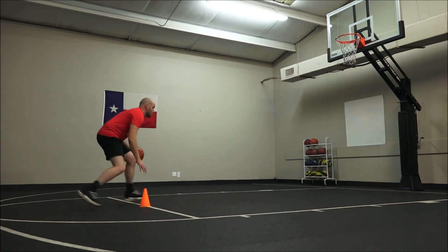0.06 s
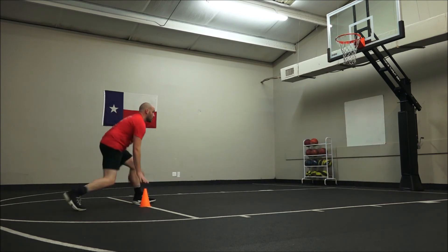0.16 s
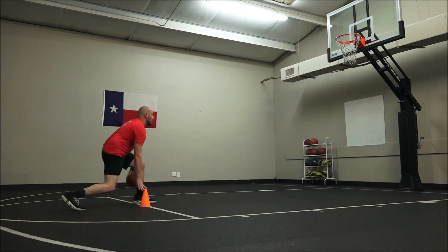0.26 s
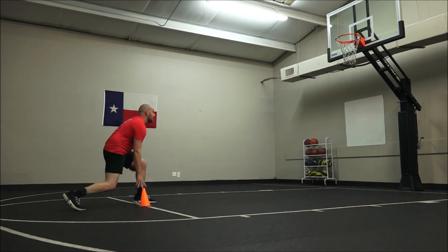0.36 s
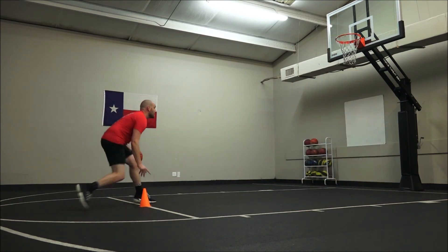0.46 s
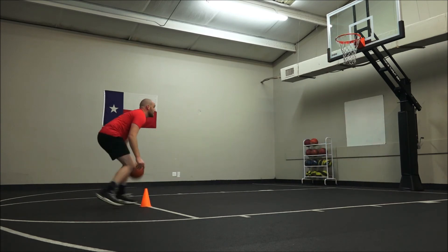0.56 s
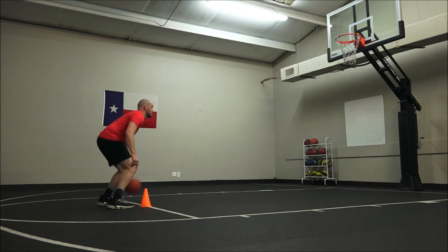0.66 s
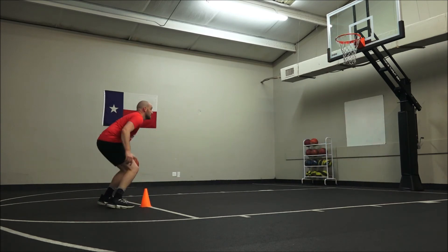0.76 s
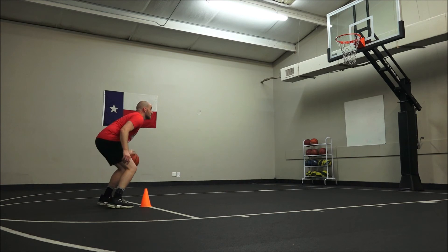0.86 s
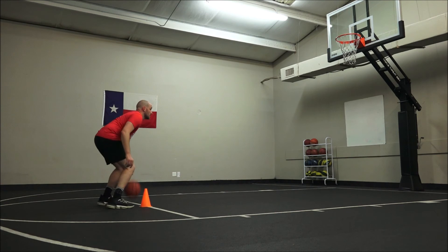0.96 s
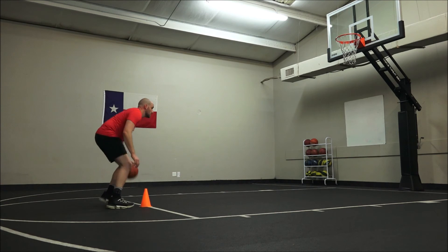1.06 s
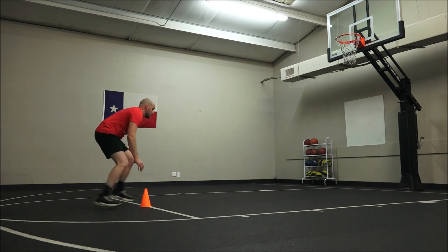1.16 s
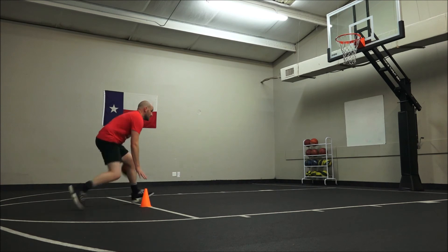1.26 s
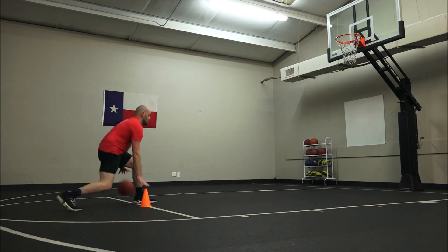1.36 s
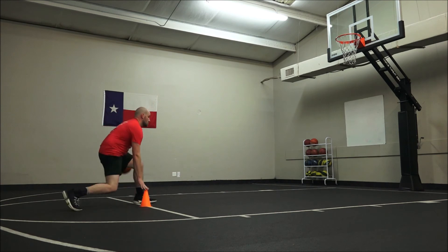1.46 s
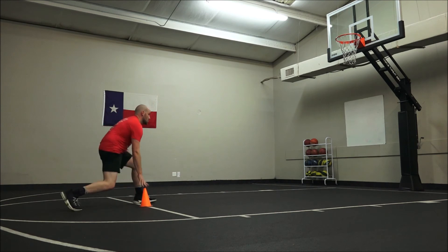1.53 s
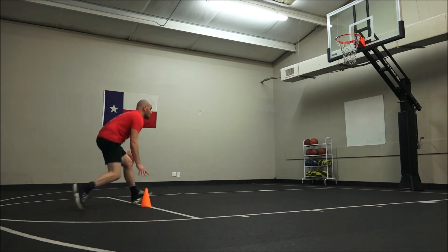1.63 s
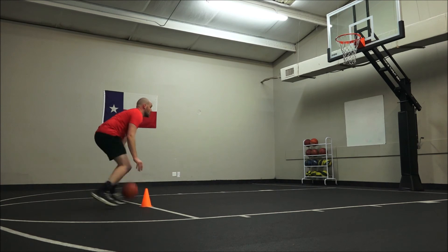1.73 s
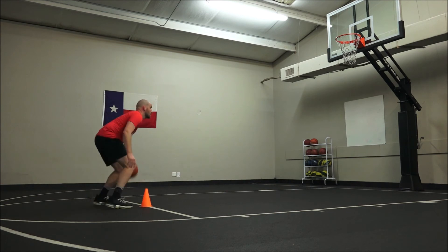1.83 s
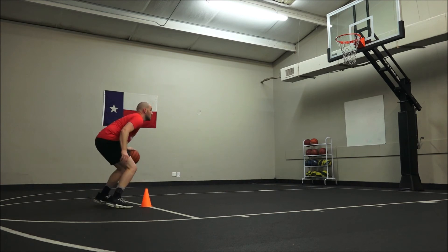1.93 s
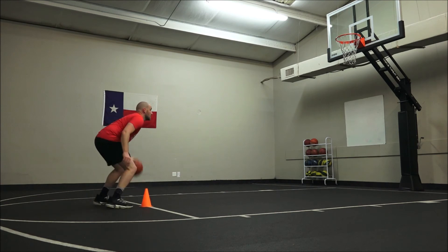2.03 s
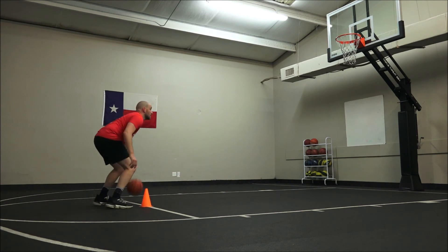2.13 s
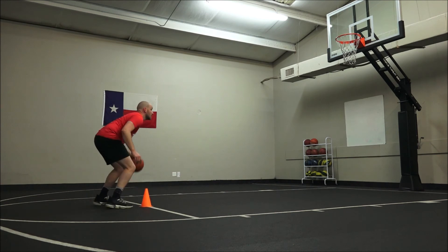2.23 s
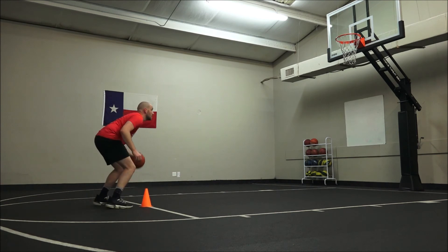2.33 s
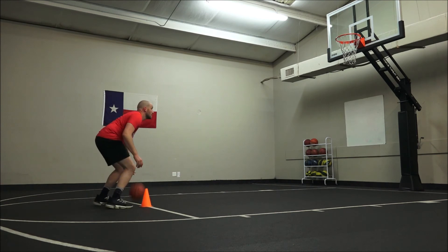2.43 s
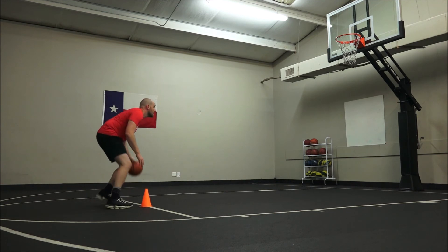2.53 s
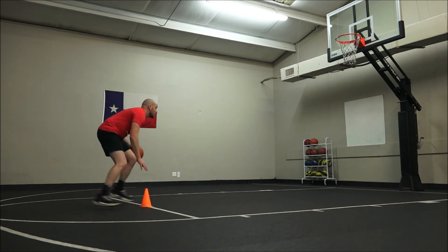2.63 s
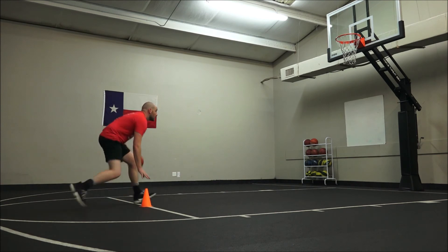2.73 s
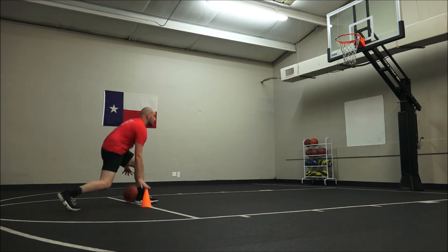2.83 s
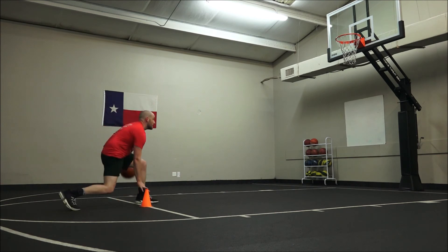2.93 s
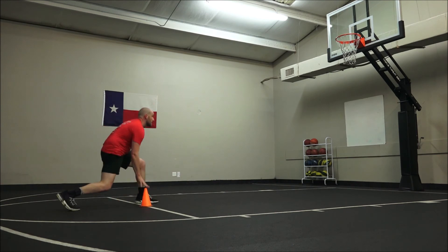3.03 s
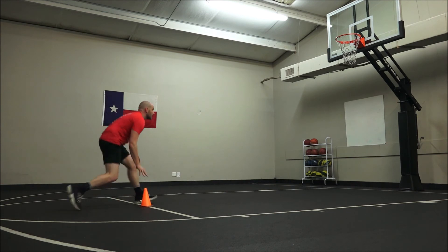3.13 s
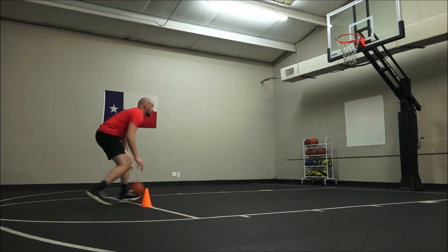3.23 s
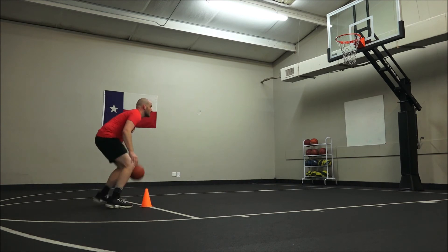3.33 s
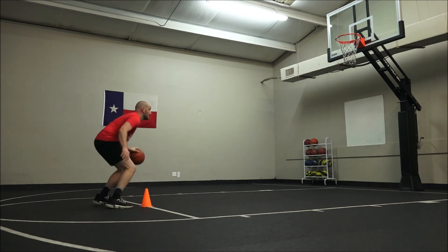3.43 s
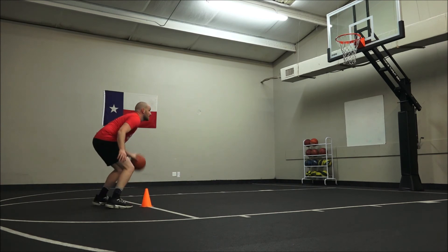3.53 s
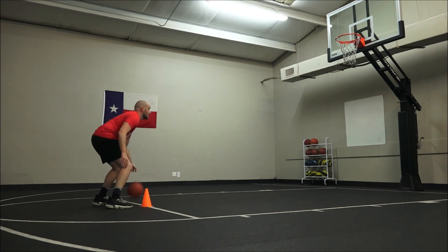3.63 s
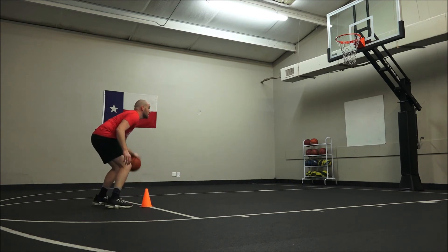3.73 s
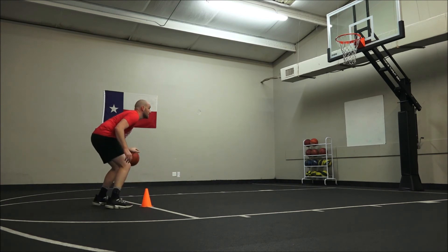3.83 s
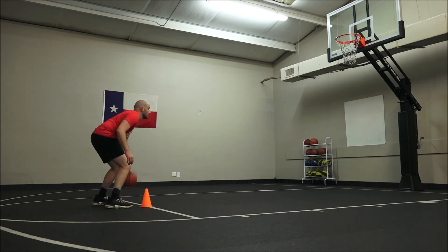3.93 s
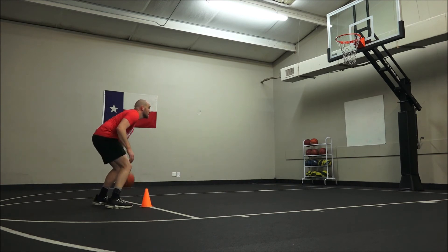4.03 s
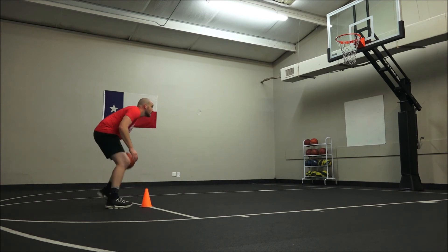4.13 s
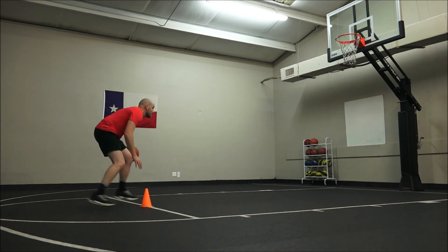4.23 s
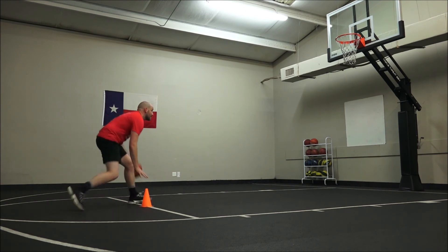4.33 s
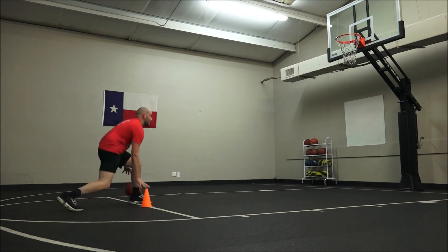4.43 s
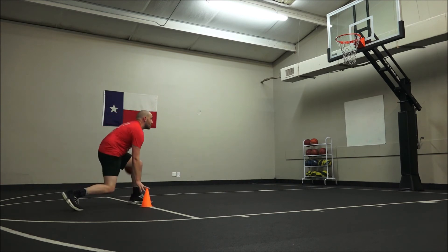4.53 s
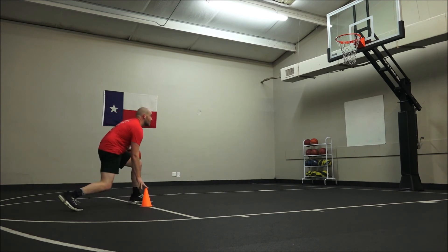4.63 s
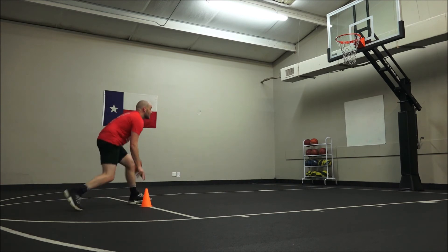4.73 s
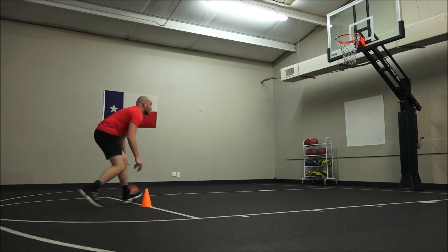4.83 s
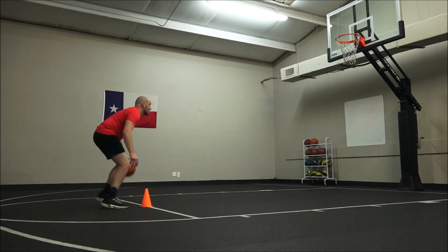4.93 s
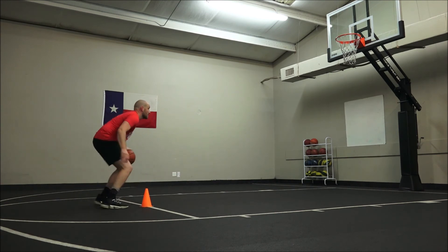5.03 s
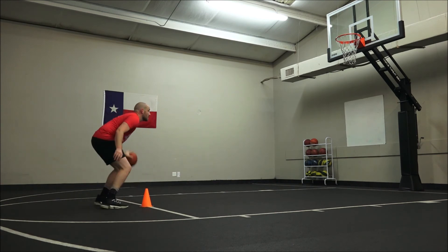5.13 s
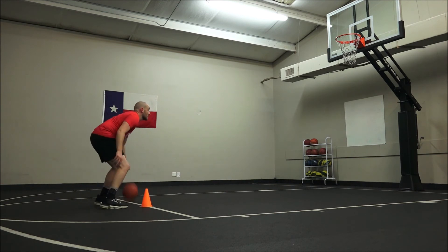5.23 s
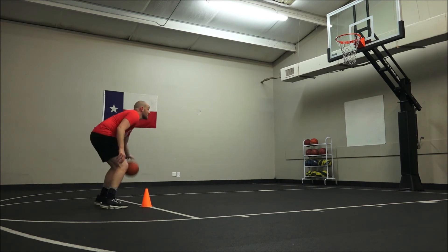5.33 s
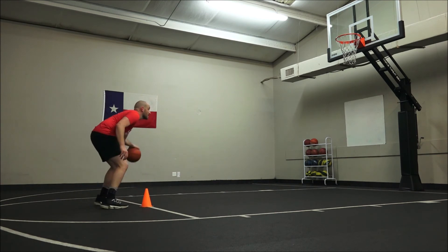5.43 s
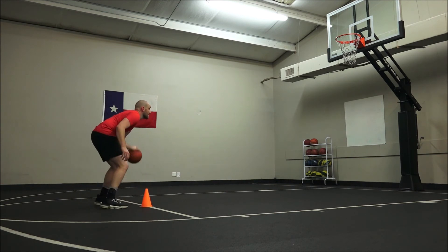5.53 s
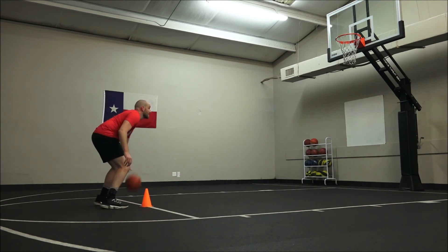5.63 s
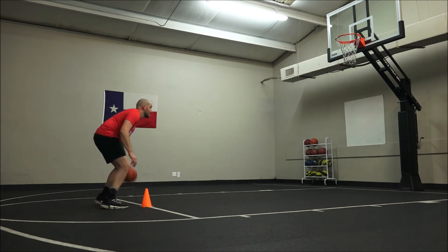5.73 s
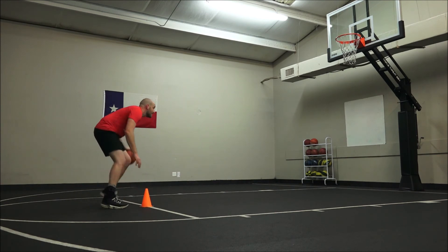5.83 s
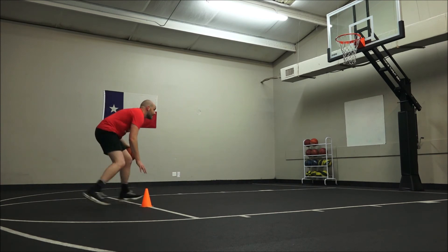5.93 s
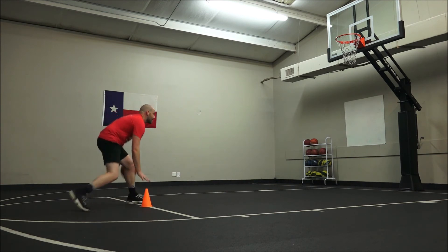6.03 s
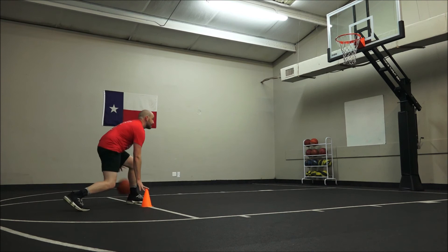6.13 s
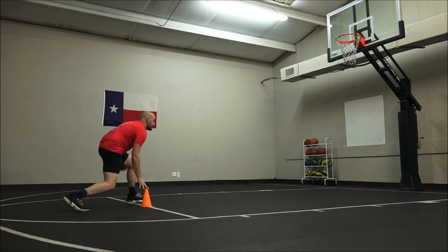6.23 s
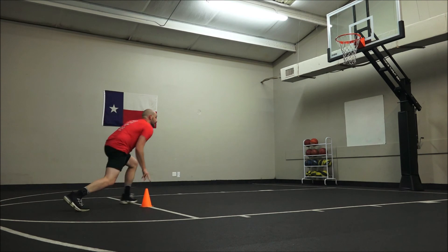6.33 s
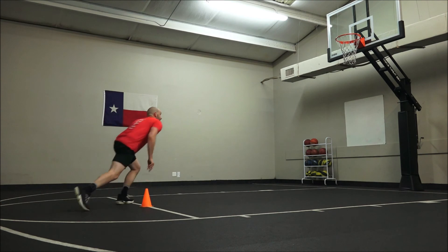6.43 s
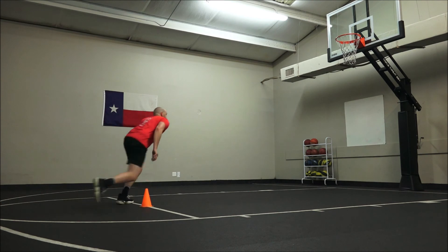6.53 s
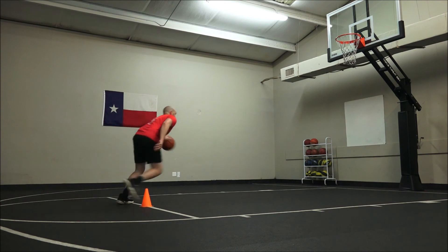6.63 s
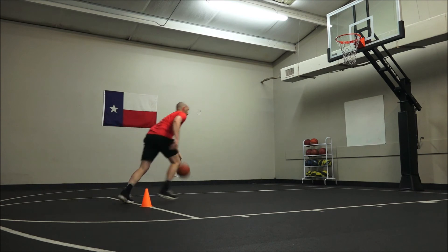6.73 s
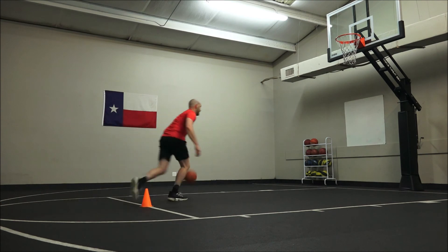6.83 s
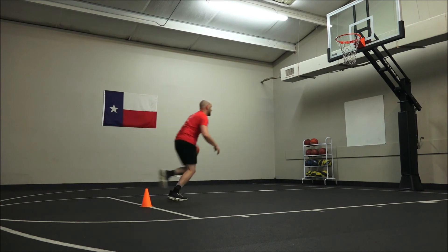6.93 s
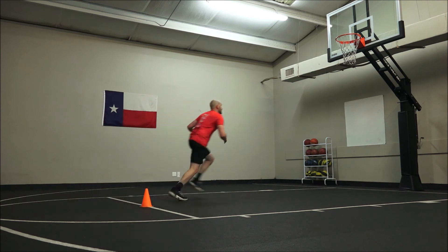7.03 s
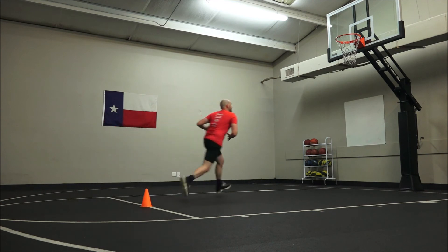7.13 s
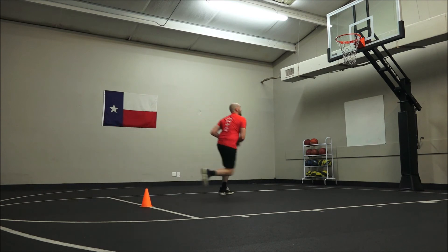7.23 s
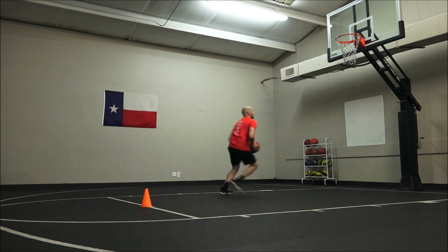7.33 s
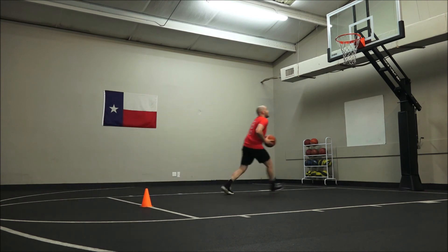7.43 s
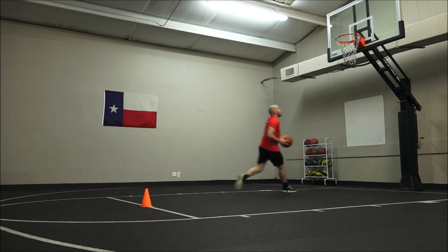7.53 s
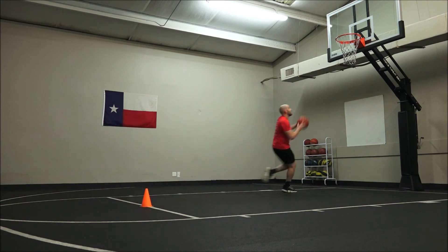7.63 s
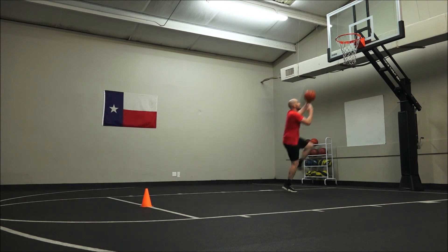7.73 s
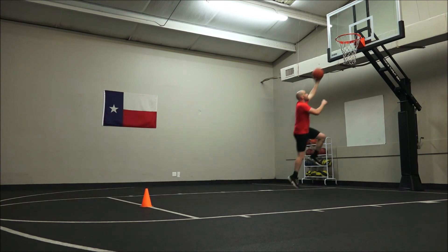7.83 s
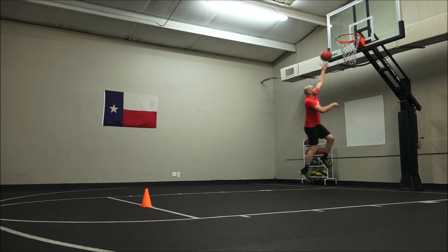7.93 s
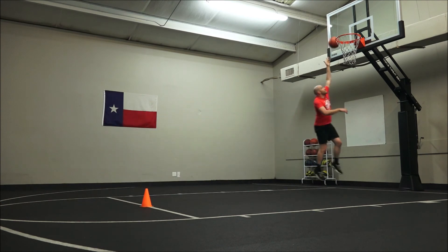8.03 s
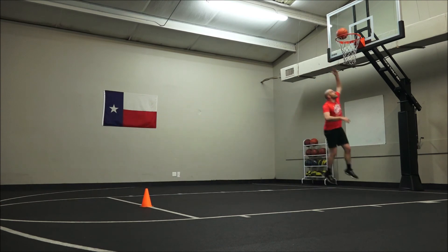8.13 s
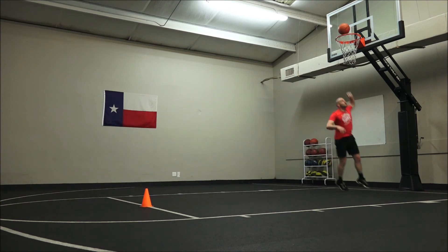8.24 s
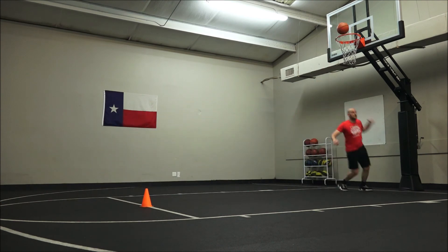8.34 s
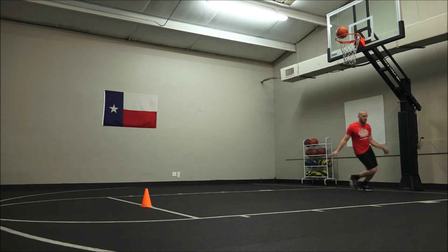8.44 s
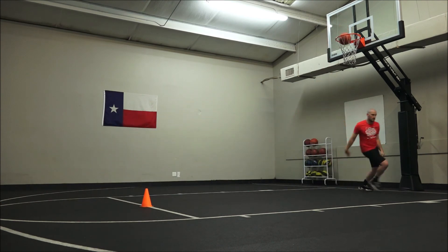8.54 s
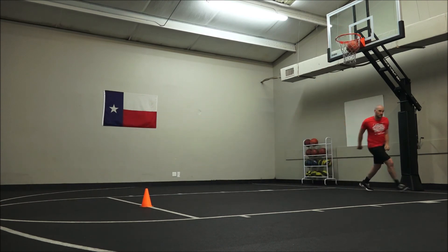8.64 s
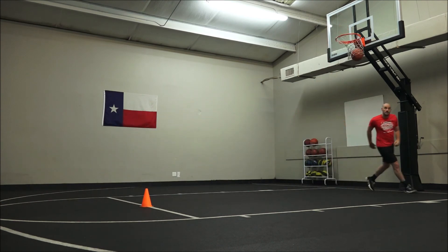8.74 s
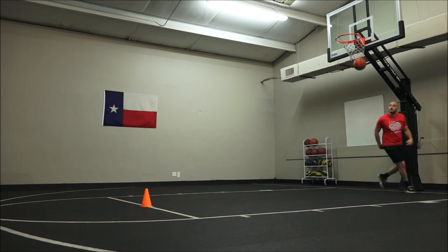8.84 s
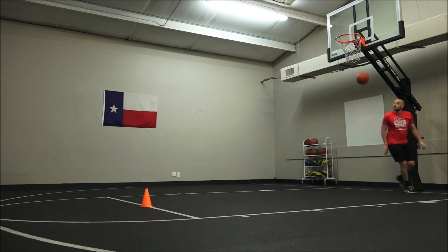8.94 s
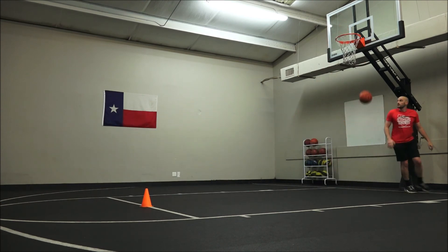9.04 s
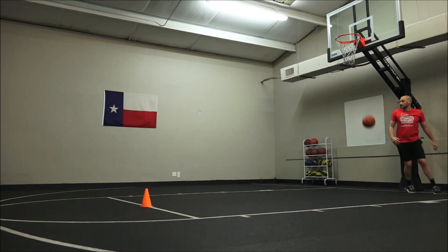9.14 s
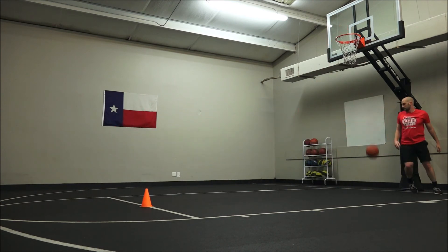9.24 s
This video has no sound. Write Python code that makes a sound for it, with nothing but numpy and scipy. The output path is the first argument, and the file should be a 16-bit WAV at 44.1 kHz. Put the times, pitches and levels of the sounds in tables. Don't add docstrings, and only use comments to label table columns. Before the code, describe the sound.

A small hard-walled gym with soft air noise and a faint low fan hum. The tail of a bounce hangs at the start; from 0.3 seconds a basketball is dribbled hard, one slap roughly every 0.35 to 0.45 seconds until 6.2. Each is a sharp crack with a very short hollow ball ring, a deep floor thump, quick wall echoes and about a second of reverberation. A shoe scuffs and knocks at 0.6 to 0.7, a duller knock comes at 4.4, and light scuffs near 6.1 and 6.4. A last strong dribble lands at 6.9 with running steps, then more steps at 7.3 and 7.6, farther and more echoing. At 8.25 the ball hits the backboard, its stand swaying low, followed by dull basket knocks and net rustle. Bright landing steps and scuffs follow at 8.6 to 8.75, then a distant bounce at 9.2.

```python
import sys
import numpy as np
from scipy import signal
from scipy.fft import rfft, irfft, next_fast_len
from scipy.io import wavfile

SR = 44100
rng = np.random.default_rng(int(sys.argv[2]) if len(sys.argv) > 2 else 0)


def attenuation_scalar(level_db):
    decades = np.asarray(level_db, float) / 20
    return 10 ** decades


def transcribe(signal):
    frames = np.atleast_2d(signal).T
    limited = np.clip(frames, -1, 1)
    pcm = np.round(limited * 32767).astype(np.int16)
    wavfile.write(sys.argv[1], SR, pcm)


N = 408807

# frequency in Hz, density in dB per Hz.
AIR_SPECTRUM = [(20, -7), (45, 0.5), (100, -8.5), (300, -9.5), (600, -12), (1200, -14.5), (4600, -23.5),
                (9200, -31.5), (13000, -31), (15000, -38), (16000, -70)]
AIR_DB = -56
# frequency in Hz, width in Hz, level in dB.
FAN_LINES = [(134.6, 6, -68), (150.7, 3, -63)]

# delay in seconds, level in dB.
ECHOES = [(0, 1), (.0025, 0.5), (.018, -1), (.0205, -1.5), (.024, -4.5), (.031, -4.5), (.041, -3),
          (.057, -6.5)]
TAIL_S = .018
# frequency in Hz, 60 dB decay time in seconds.
GYM_T60 = [(100, 2), (250, 0.87), (500, 1.68), (1100, 1.03), (3000, 1.316), (7000, 1.26), (10000, 0.77),
           (13000, 0.58)]
# frequency in Hz, density in dB per Hz.
COLOUR = [(60, -41.5), (150, -8.5), (250, -8.5), (400, -10), (520, -18), (680, -23), (950, -15.5),
          (1500, -13.5), (3000, -17), (5300, -21), (7500, -30), (10500, -40.5), (12300, -38), (14500, -44),
          (16200, -70)]

# frequency in Hz, level in dB, 60 dB decay time in seconds.
MODES_WITH = [(60.6, -25.5, 0.72), (69.4, -29.5, 1.1), (106.3, -9.5, 0.62), (117.3, -35, 1.3),
              (129.8, -14, 0.58), (134, -40, 1.4), (163.2, -27.5, 1.37), (180.6, -31.5, 0.74),
              (193, -22.5, 0.8), (231.4, -32.5, 2.75), (339, -50.5, 0.27), (375.4, -34, 1.78)]
# frequency in Hz, level in dB, 60 dB decay time in seconds.
MODES_AGAINST = [(80.8, -23.5, 1), (92.1, -21.5, 1), (99.8, -19.5, 0.92), (184.3, -20.5, 0.39),
                 (208.2, -20.5, 0.57), (239.2, -16, 0.278), (242.7, -35.5, 1), (261, -42, 0.11),
                 (318.8, -26, 0.46)]

# centre in seconds, level in dB, length in seconds, centre frequency in Hz.
SCUFFS = [(0.642, -39, 0.057, 1764), (1.712, -59, 0.11, 3470), (3.21, -79, .08, 3500),
          (6.096, -51, 0.044, 2500), (6.428, -41, 0.088, 6980), (7.314, -73, 0.049, 950),
          (8.4, -52, .12, 496), (8.375, -47, 0.092, 3660), (8.617, -41.5, 0.11, 3386),
          (8.759, -42.5, 0.1, 5630), (7.308, -40, .05, 10000), (9.191, -54.5, .05, 1390)]

# start in
# seconds, knock in dB, ring in Hz, floor thump in dB.
FAR_STEPS = [
    (6.868, -17, 240, -57),
    (7.33, -28, 440, -67),
    (8.572, -24, 930, -62),
    (8.74, -24.5, 1150, -45),
    (8.58, -30, 385, -55),
]
STEP_CRACK_DB = -8
# start in seconds, knock in dB, ring in Hz, crack in dB over the ring, floor thump in dB.
FAR_KNOCKS = [
    (7.28, -27.5, 1135, 1.5, -47.5),
    (7.305, -22, 960, -3.5, -70),
    (7.562, -28, 895, -1.5, -75),
    (7.636, -35.5, 4450, 9, -70),
    (8.243, -24.5, 1230, 4, -46),
    (8.313, -17.5, 580, -23, -65),
    (8.344, -25, 553, 1, -45),
    (8.37, -31, 527, -18, -40),
    (8.567, -20, 3540, 3, -43),
    (9.209, -17, 660, -5.5, -54),
]
# frequency in Hz, level in dB, 60 dB decay time in seconds.
BOARD_MODES = [(41.3, -11, 1.8), (52, -14, 1.16), (68.2, 1.5, 0.38), (90.5, -2, 0.33), (146, -5.5, 0.43),
               (214, -4.5, 0.24)]
BOARD_S, BOARD_DB = 8.241, -34.5

# start in seconds, knock in dB, ring in Hz, crack in dB over the ring.
NEAR_KNOCKS = [
    (.005, -33, 1070, -13),
    (0.6, -23, 1544, -6),
    (.665, -12.5, 1740, -5.5),
    (4.382, -18, 960, -12),
]

# start in seconds, slap in dB, ball ring in Hz, crack in dB over the ring, floor thump in dB.
BOUNCES = [(-0.12, -13, 1210, 1.5, -23), (0.28, -14, 977, 4.5, -23.5), (0.702, -17.5, 1010, 11.5, -21.5),
           (1.052, -12.5, 967, 7.5, -22.5), (1.408, -13.5, 1262, 5.5, -21), (1.814, -13, 1190, 8, -25),
           (2.174, -10.5, 1243, -2, -24.5), (2.512, -10, 873, 2.5, -22), (2.907, -15, 966, 7.5, -23.5),
           (3.317, -9, 999, -2.5, -25), (3.689, -12.5, 1030, 6, -23), (4.048, -14, 2222, 5, -25.5),
           (4.484, -12.5, 990, 4.5, -24.5), (4.898, -12.5, 1410, 6.5, -22.5), (5.313, -11, 1537, 4.5, -22),
           (5.738, -11, 1850, 1, -20), (6.177, -11.5, 995, 2, -22), (6.862, -12.5, 1420, 4.5, -22.5)]
# frequency in Hz, level in dB, 60 dB decay time in seconds.
BALL_AIR = [(921, -46, 0.037), (1315, -28.5, 0.017), (1737, -35, 0.018), (2060, -31.5, 0.0059),
            (2500, -24.5, 0.005), (2900, -30, 0.0068)]
RING_T60 = .0065
SPOT_DB = 2.5
PANEL_DB = 1.6
USUAL_CRACK_DB, BEAMED = -11, 0.35
USUAL_KNOCK_DB, KNOCK_BEAMED, KNOCK_THUMP_DB = -14.5, 0.48, -60

# frequency in Hz, correlation.
PORT_LIKENESS = [(60, 1), (300, .996), (600, .99), (2400, .996), (4500, .995), (6000, .93), (7000, .8),
                 (8100, .3), (9600, -.15), (10700, .5), (11700, .97)]
# frequency in Hz, left minus right in dB.
PORT_LEAN = [(60, 3.5), (110, 4), (200, 2), (380, 1.1), (1000, .8), (2400, .2), (7000, .5), (8400, 1.6),
             (11000, .2)]


def evened(x):
    return x / np.sqrt(np.mean(x ** 2) + 1e-20)


def read(points, hz):
    f, value = np.transpose(points)
    return np.interp(np.log(hz + 1), np.log(f + 1), value)


def add(mix, s, sound):
    at = round(s * SR)
    sound = sound[..., max(-at, 0):]
    part = mix[..., max(at, 0):][..., :sound.shape[-1]]
    part += sound[..., :part.shape[-1]]


def causal(points, size=4096):
    hz = abs(np.fft.fftfreq(size, 1 / SR))
    log_gain = np.log(attenuation_scalar(np.maximum(read(points, hz), -100)))
    spectrum = np.exp(np.conj(signal.hilbert(log_gain)))
    return np.fft.ifft(spectrum).real[:size // 2]


def ring(modes, seconds):
    hz, db, t60 = np.transpose(modes)[..., None]
    t = np.arange(round(seconds * SR)) / SR
    return attenuation_scalar(db - 60 * t / t60) * np.sin(2 * np.pi * hz * t)


def room_tone():
    hz = np.fft.rfftfreq(N, 1 / SR)
    noise = rfft(rng.standard_normal((2, N)))
    tone = attenuation_scalar(AIR_DB) * evened(irfft(noise * attenuation_scalar(read(AIR_SPECTRUM, hz)), N))
    for f, width, db in FAN_LINES:
        resonance = 1 / (1 + (2 * (hz - f) / width) ** 2)
        hum = irfft(rfft(rng.standard_normal(N)) * resonance, N)
        tone = tone + attenuation_scalar(db) * evened(hum)
    return tone


def gym(early_db=-2, gap_db=-13, fill_s=0.02):
    hz, frames = np.fft.rfftfreq(256, 1 / SR), np.arange(400) * 128 / SR
    noise = rng.standard_normal((2, 129, 400, 2)) @ [1, 1j]
    decay = attenuation_scalar(-60 * frames / read(GYM_T60, hz)[:, None])
    tail = signal.istft(noise * decay, nperseg=256)[1]
    t = np.arange(tail.shape[1]) / SR
    filling = np.where(t < TAIL_S, attenuation_scalar(gap_db), 1 - 0.27 * np.exp(-(t - TAIL_S) / fill_s))
    tail = tail * filling / np.linalg.norm(tail[0])
    echoes = np.zeros(len(t))
    for s, db in ECHOES:
        echoes[round(s * SR * rng.uniform(.98, 1.02))] = attenuation_scalar(db)
    return echoes, attenuation_scalar(early_db + 13.5) * tail


def scuff(db, seconds, hz):
    size = round(seconds * SR)
    grain_gain = attenuation_scalar(6.7 * rng.standard_normal(size // 64 + 1)).repeat(64)[:size]
    grains = rng.standard_normal(size) * grain_gain
    band_filter = signal.butter(1, [hz / 1.48, hz * 2.13], "band", fs=SR)
    band = signal.lfilter(*band_filter, grains)
    echoes, tail = gym()
    heard = signal.fftconvolve((band * np.hanning(size))[None], echoes + tail, axes=1)
    return attenuation_scalar(db) * heard / np.sqrt(np.mean(heard[:, :2 * size] ** 2))


def thump(body, db, rise_s=0.0059):
    body = body * (1 - np.exp(-np.arange(len(body)) / SR / rise_s))
    return attenuation_scalar(db) * body / np.sqrt(np.mean(body[:SR // 10] ** 2))


def floor_thump(floor, spread_db, db):
    shares = attenuation_scalar(spread_db * rng.standard_normal(len(floor)))
    return thump(shares @ floor, db)


def backboard():
    return thump(ring(BOARD_MODES, 1.2).sum(0), BOARD_DB, rise_s=0.023)


def blow(db, ring_hz, crack_db, echo_db, shell=0, near_db=-8, far_db=-21, ring_t60=RING_T60,
         thin_hz=450, gap_db=-13):
    t = np.arange(SR // 20) / SR
    crack = attenuation_scalar(crack_db - 17 - 60 * t / .008) * rng.standard_normal(len(t))
    crack[0] += attenuation_scalar(crack_db + 2.0)
    ping = ring([(ring_hz, 0, ring_t60)], 1 / 20)[0]
    echoes, tail = gym(gap_db=gap_db)
    thin = signal.butter(2, thin_hz, "high", fs=SR)
    source = signal.lfilter(*thin, crack + attenuation_scalar(near_db) * ping + attenuation_scalar(7.0) * shell)
    direct = signal.oaconvolve(source, echoes)
    rung = signal.oaconvolve((attenuation_scalar(far_db) * ping + shell)[None], tail[::-1], axes=1)
    add(rung, 0, attenuation_scalar(crack_db) * tail)
    direct_db = -.6 * gap_db - 15.5
    return attenuation_scalar(db) * (attenuation_scalar(direct_db) * direct + attenuation_scalar(echo_db) * rung)


def far_knocks(bright, low, floor):
    steps = [(s, db, ring_hz, STEP_CRACK_DB, thump_db) for s, db, ring_hz, thump_db in FAR_STEPS]
    for s, db, ring_hz, crack_db, thump_db in [*FAR_KNOCKS, *steps]:
        knock = blow(db - 3, ring_hz, crack_db, 0, far_db=-17.5, ring_t60=9.0 / ring_hz,
                     thin_hz=201, gap_db=-0.5)
        add(bright, s, knock)
        add(low, s, floor_thump(floor, 4.6, thump_db))


def near_knocks(bright, low, floor):
    for s, db, ring_hz, crack_db in NEAR_KNOCKS:
        echo_db = KNOCK_BEAMED * (USUAL_KNOCK_DB - db)
        knock = blow(db - 1, ring_hz, crack_db, echo_db, near_db=-1.5, far_db=-14.5,
                     ring_t60=0.002, thin_hz=260)
        add(bright, s + 0.00106, knock)
        add(low, s + 0.0061, floor_thump(floor, 10, KNOCK_THUMP_DB))


def landed(sound):
    hz = np.arange(400, 9000, 450)
    bumps = np.c_[hz, PANEL_DB * rng.standard_normal(len(hz))]
    return signal.oaconvolve(sound, causal(bumps, size=512)[None], axes=1)


def ball_bounces(bright, low, floor):
    ball = ring(BALL_AIR, 1 / 20)
    for s, db, ring_hz, crack_db, thump_db in BOUNCES:
        shell = attenuation_scalar(2 * rng.standard_normal(len(ball))) @ ball
        echo_db = BEAMED * (USUAL_CRACK_DB - db - crack_db)
        slap = blow(db, ring_hz, crack_db, echo_db, shell)
        add(bright, s + 0.001268, landed(slap))
        add(low, s + 0.00418, floor_thump(floor, SPOT_DB, thump_db))


def scene():
    bright, low = np.zeros((2, N)), np.zeros(N)
    floor = np.vstack([ring(MODES_WITH, 1.2), -ring(MODES_AGAINST, 1.2)])
    for s, db, seconds, hz in SCUFFS:
        add(bright, s - seconds / 2, scuff(db - 9.5, seconds, hz))
    far_knocks(bright, low, floor)
    add(low, BOARD_S, backboard())
    near_knocks(bright, low, floor)
    ball_bounces(bright, low, floor)
    colour = causal(COLOUR)
    colour = attenuation_scalar(6) * colour / np.linalg.norm(colour)
    coloured = signal.oaconvolve(bright, colour[None], axes=1)[:, :N]
    return coloured + low + room_tone()


def band_limit(x):
    return signal.sosfilt(signal.butter(12, 16410, fs=SR, output="sos"), x)


def record(dry):
    size = next_fast_len(N)
    hz = np.fft.rfftfreq(size, 1 / SR)
    field, other = rfft(dry, size)
    same = read(PORT_LIKENESS, hz)
    skew = attenuation_scalar(read(PORT_LEAN, hz) / 2)
    left = field * skew
    right = (same * field + np.sqrt(1 - same ** 2) * other) / skew
    ports = irfft(np.array([left, right]), size)[:, :N]
    return band_limit(ports)


dry = scene()
out = record(dry)
transcribe(out)
```